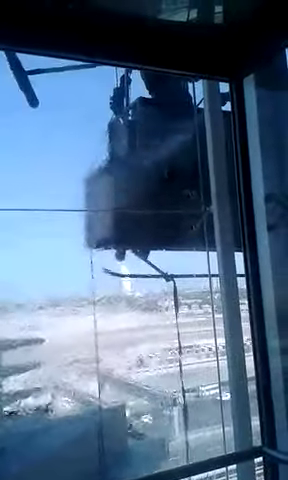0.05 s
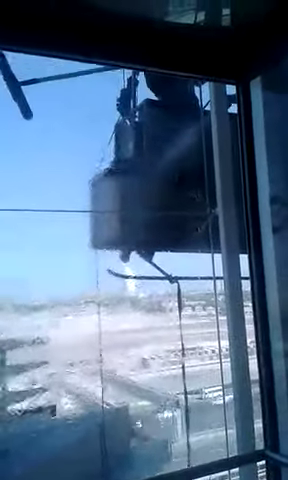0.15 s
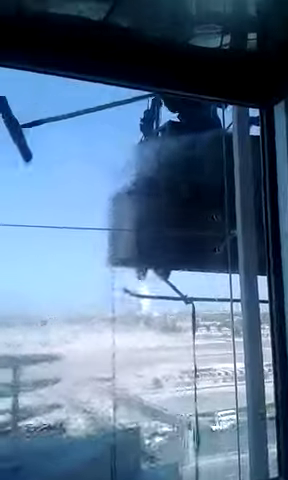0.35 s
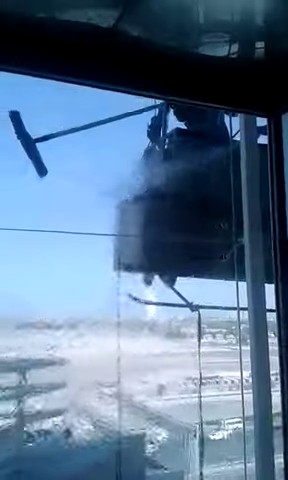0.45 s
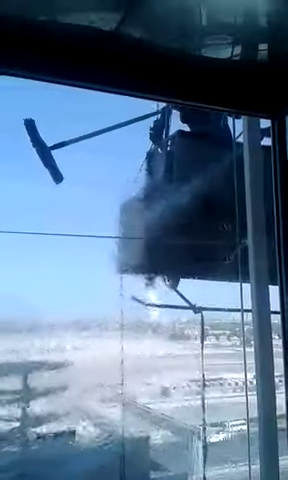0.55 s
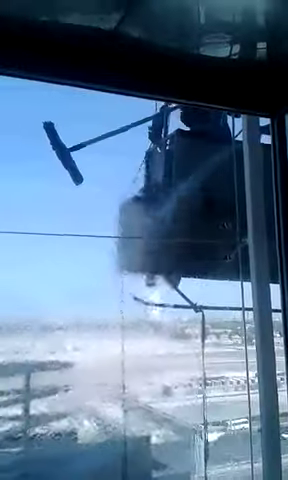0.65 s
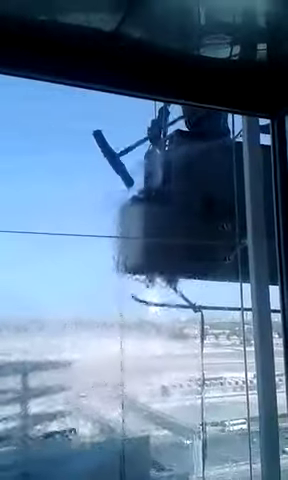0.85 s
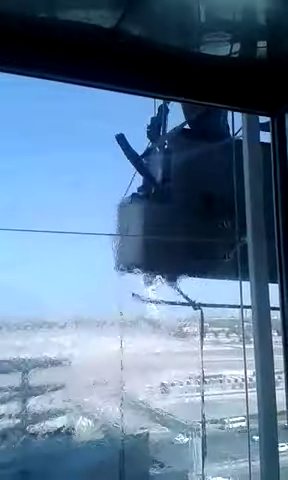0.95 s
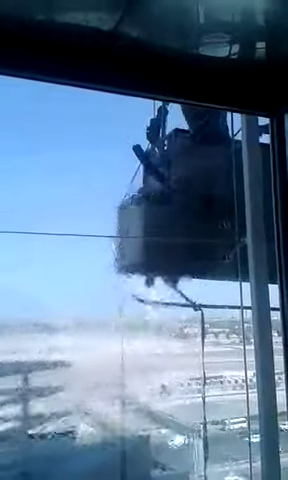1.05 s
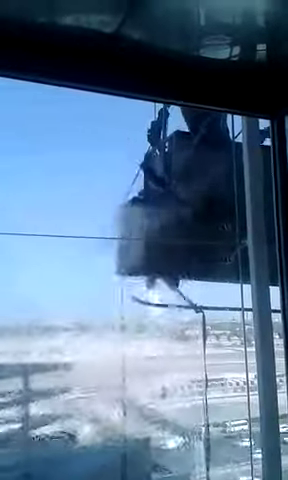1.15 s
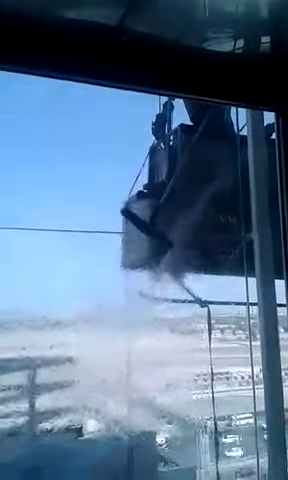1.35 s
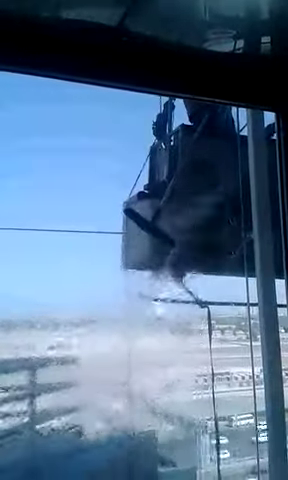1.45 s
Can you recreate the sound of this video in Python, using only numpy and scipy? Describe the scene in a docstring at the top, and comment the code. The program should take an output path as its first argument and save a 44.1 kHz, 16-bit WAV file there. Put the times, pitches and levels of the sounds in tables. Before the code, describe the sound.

Wind and far traffic rumbling behind a high window, broken by a single loud click.

```python
"""A steady rush of wind and distant traffic, heard from behind a high-rise window.
Almost at once a sharp electrical pop, a voltage step in the microphone, overloads the input:
a limiter clamps for an instant, then the gain control sinks, holds and slowly lets the rush return.
Two soft wind buffets pass; faint resonances and a thin whistle of air sit far back in the rush."""
import sys
import numpy as np
from scipy import signal
from scipy.fft import rfft, irfft
from scipy.io import wavfile
from scipy.ndimage import uniform_filter1d

SR = 44100
rng = np.random.default_rng(int(sys.argv[2]) if len(sys.argv) > 2 else 0)


def int16_out(signal):
    """Quantize to a 16-bit WAV file."""
    q = np.round(np.clip(np.atleast_2d(signal).T, -1, 1) * 32767)
    wavfile.write(sys.argv[1], SR, q.astype(np.int16))


N = 66150
TIME_S, FREQ_HZ = np.arange(N) / SR, np.fft.rfftfreq(N, 1 / SR)


def electrical_pop(start_s=0.2103, step_db=18.5, stages=4, corner_hz=83):
    """Right in the microphone, a voltage step swings back through the bass-blocking stages."""
    voltage = amp(step_db) * np.clip(np.arange(N) - start_s * SR, 0, 1)
    bass_block = signal.butter(1, corner_hz, "high", fs=SR)
    for _ in range(stages):
        voltage = signal.lfilter(*bass_block, voltage)
    return voltage


# The air outside, from behind the window. Each row: frequency in Hz, relative spectral level in dB.
RUSH_SPECTRUM = [(20, -11), (45, -22), (70, -9), (125, 1), (215, -0.5), (330, -10.5), (490, -10.5),
                 (720, -11), (1000, -13), (1600, -15.5), (2200, -19), (3200, -23), (3900, -19.5),
                 (4800, -21), (6000, -32), (8000, -39), (11000, -40.5), (15600, -40.5)]

def outside_rush(level_db=-38, patch_db=0.5, patch_s=0.05, patch_hz=500):
    """Wind and far traffic merge into bass-heavy noise with faint drifting patches of turbulence."""
    hz, t, cells = signal.stft(rng.standard_normal(N), SR, nperseg=512, noverlap=384)
    patches = uniform_filter1d(rng.standard_normal(cells.shape), round(patch_s / t[1]), axis=1)
    patches = unit_rms(uniform_filter1d(patches, round(patch_hz / hz[1]), axis=0))
    air = signal.istft(cells * amp(patch_db * patches), nperseg=512, noverlap=384)[1][:N]
    row_hz, row_db = np.transpose(RUSH_SPECTRUM)
    colour_db = np.interp(np.log(FREQ_HZ + 1), np.log(row_hz + 1), row_db)
    air = irfft(rfft(air) * amp(colour_db), N)
    return amp(level_db) * unit_rms(low_pass(air, hz=15800))


# The low rumble outside the window. Each row: time in seconds, bass gain in dB.
RUMBLE_GAIN = [(0, 2), (.3, -1.5), (.6, -1.5), (1.0, 0), (1.22, 1), (1.5, -2.5)]

def wind_swell(rush, below_hz=550):
    """The bass rises and falls with the wind while the hiss stays even."""
    bass = irfft(rfft(rush) / (1 + (FREQ_HZ / below_hz) ** 2), N)
    treble = rush - bass
    return treble + bass * gain_curve(RUMBLE_GAIN)


# Low buffets reaching the microphone. Each row: time of the peak in seconds, peak level in dB.
WIND_BUFFETS = [(0.448, -28.5), (1.220, -27)]

def wind_buffets(hz=170, half_width_s=0.0044):
    """Each buffet is a soft push of air, a cycle or two long."""
    pressure = np.zeros(N)
    for peak_s, db in WIND_BUFFETS:
        t = TIME_S - peak_s
        pressure += amp(db) * np.exp(-(t / half_width_s) ** 2) * np.cos(2 * np.pi * hz * t)
    return pressure


# Faint tones at the window. Each row: centre in Hz, half-width in Hz, level in dB.
RESONANCES = [(282, 26, -54), (397.7, 22.5, -51), (650, 28, -53), (1254, 11, -63), (13798, 22, -81)]

def resonances():
    """Narrow resonances colour the rush with steady, fuzzy tones."""
    return sum(amp(db) * narrow_noise(hz, half_width_hz) for hz, half_width_hz, db in RESONANCES)


# A whistle far back in the rush. Each row: time in seconds, level in dB.
WHISTLE_LEVEL = [(0, -62), (.2, -50), (.45, -58), (.78, -56), (.89, -48), (1.049, -57.5), (1.5, -65)]

def air_whistle():
    """Air whistles thinly on one fuzzy pitch that comes and goes."""
    return gain_curve(WHISTLE_LEVEL) * narrow_noise(hz=1769.6, half_width_hz=14)


def narrow_noise(hz, half_width_hz):
    """Noise in one narrow resonance, rms 1."""
    response = 1 / (1 + ((FREQ_HZ - hz) / half_width_hz) ** 2)
    return unit_rms(irfft(rfft(rng.standard_normal(N)) * response, N))


def amp(db):
    """Decibels to gain."""
    return 10 ** (np.asarray(db) / 20)


def gain_curve(rows):
    """Gain gliding through rows of seconds and dB."""
    return amp(np.interp(TIME_S, *np.transpose(rows)))


def unit_rms(x):
    """Scales to rms 1."""
    return x / np.sqrt(np.mean(x ** 2) + 1e-20)


def envelope(t, attack_s, hold_until_s, release_s):
    """Rises towards 1, holds, and dies away."""
    return (1 - np.exp(-t / attack_s)) * np.exp(-np.maximum(t - hold_until_s, 0) / release_s)


def low_pass(x, hz):
    """Steep low-pass."""
    return signal.oaconvolve(x, signal.firwin(401, hz, window=("kaiser", 9), fs=SR), "same")


def scene():
    """One microphone behind the window: the air outside, and its own pop."""
    outside = wind_swell(outside_rush()) + resonances() + air_whistle() + wind_buffets()
    return (outside + electrical_pop())[None]


def record(dry, full_scale=0.68):
    """The first overload trips a fast limiter and a slow gain control; clipping and a low-pass follow."""
    mic = dry[0]
    tripped = np.maximum.accumulate(abs(mic) > full_scale)
    since_trip_s = np.cumsum(tripped) / SR
    limiter_db = 13 * envelope(since_trip_s, attack_s=0.00031, hold_until_s=0.01, release_s=0.0021)
    duck_db = 13 * envelope(since_trip_s, attack_s=0.12, hold_until_s=0.42, release_s=0.3)
    clipped = np.clip(mic * amp(-limiter_db - duck_db), -full_scale, full_scale)
    return low_pass(clipped, hz=16700)[None]


dry = scene()
out = record(dry)
int16_out(out)
```